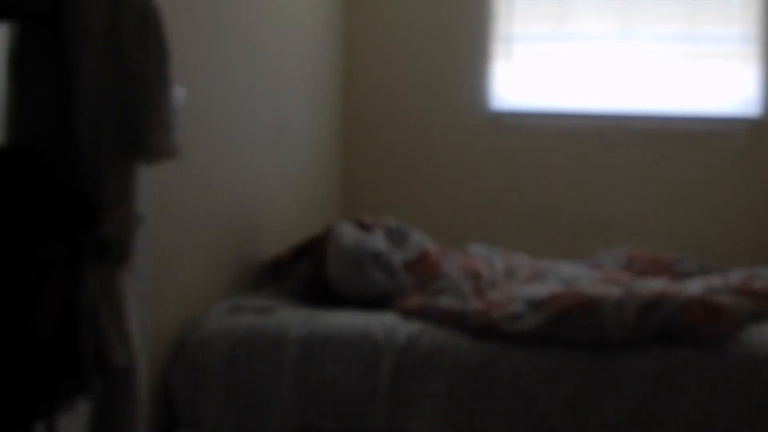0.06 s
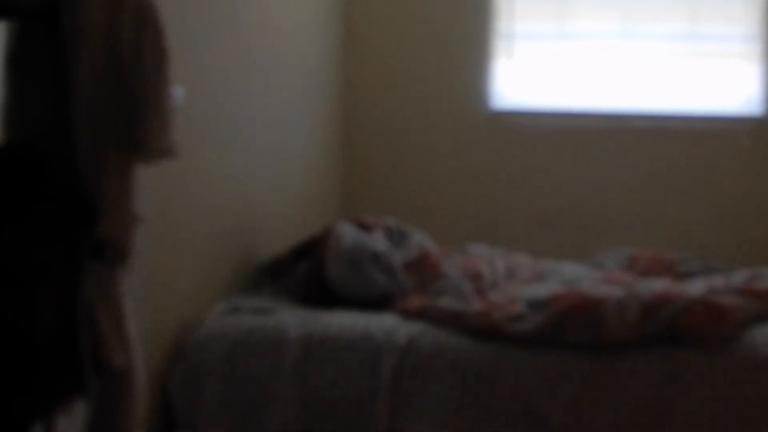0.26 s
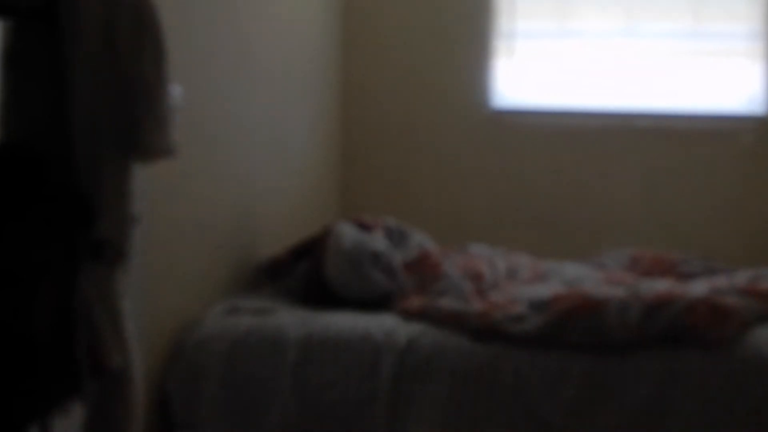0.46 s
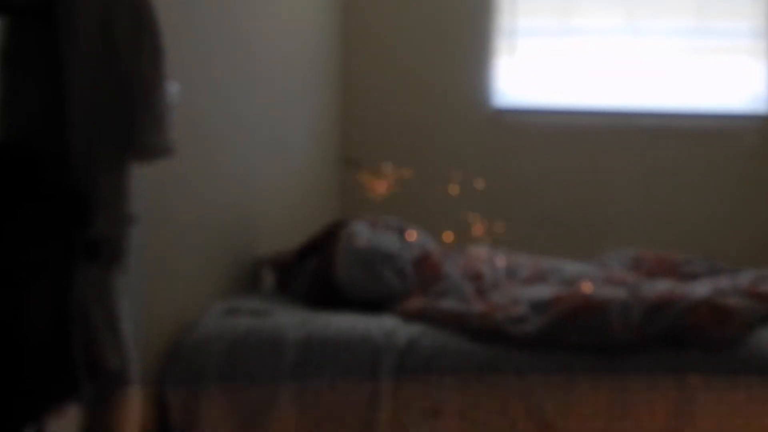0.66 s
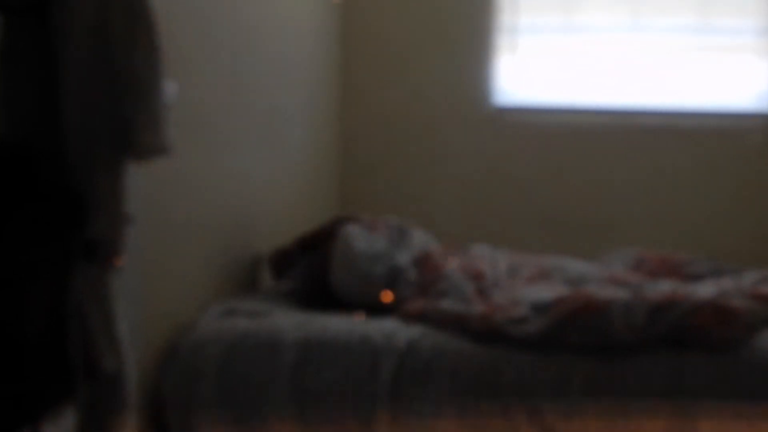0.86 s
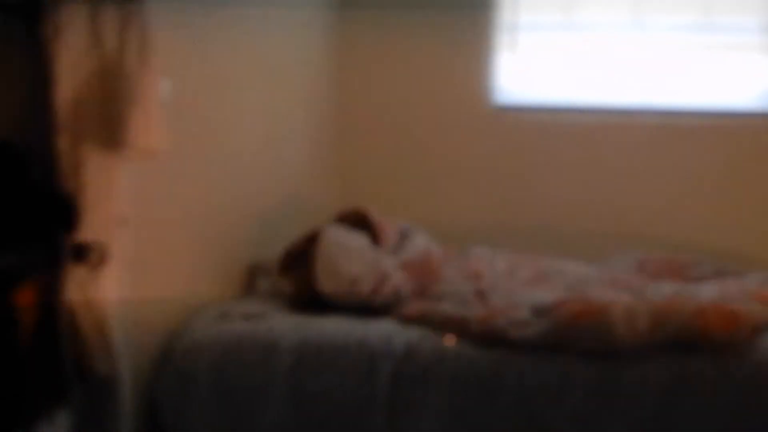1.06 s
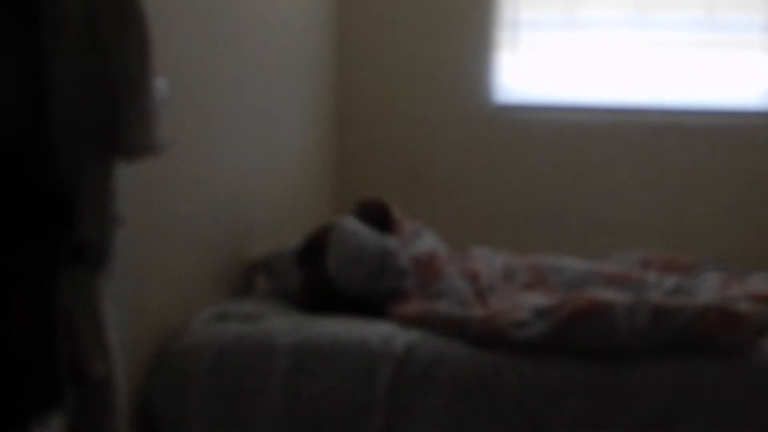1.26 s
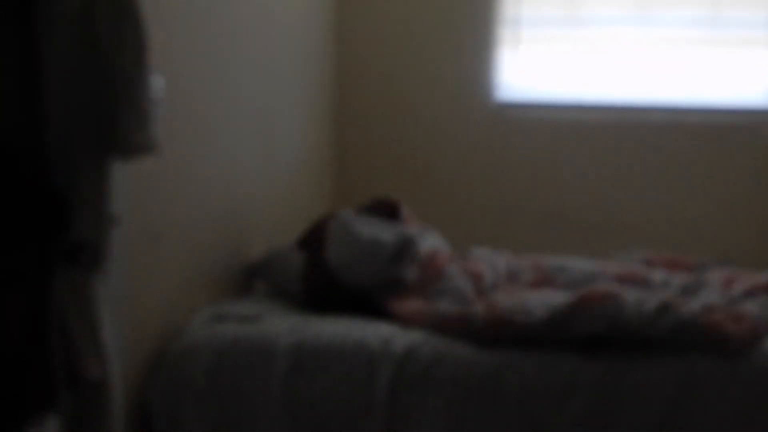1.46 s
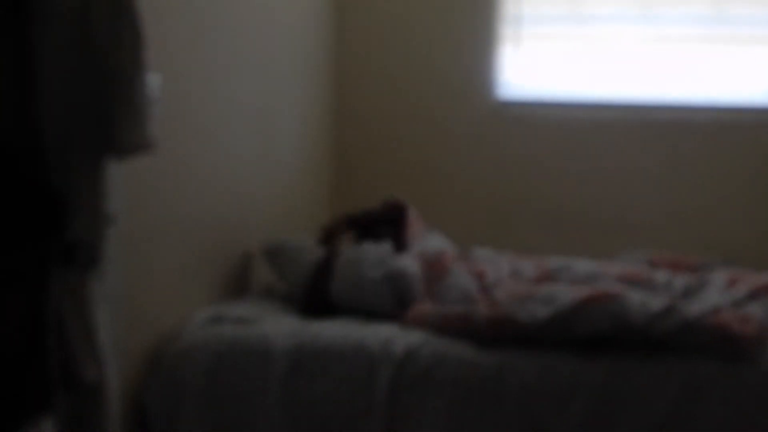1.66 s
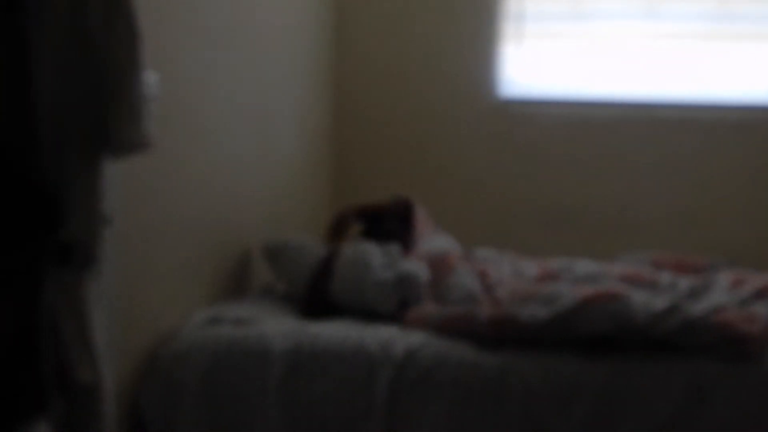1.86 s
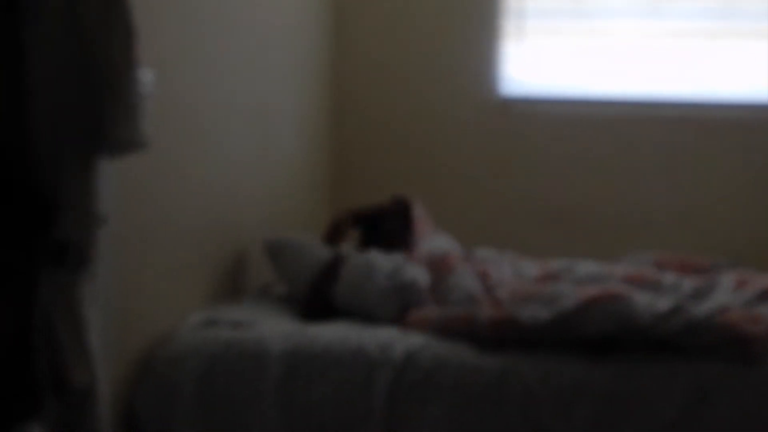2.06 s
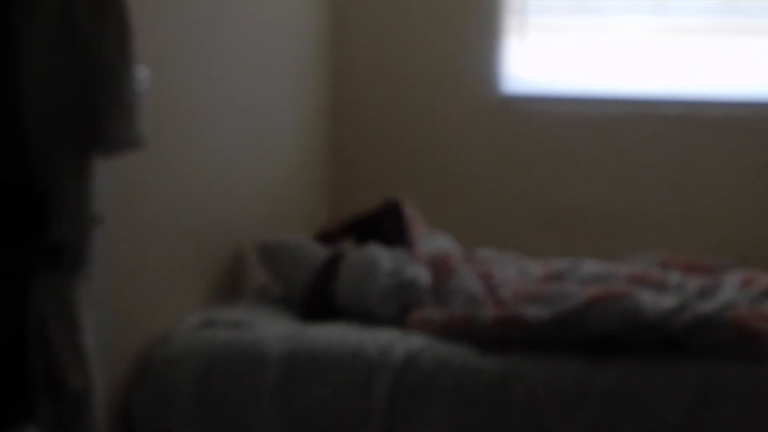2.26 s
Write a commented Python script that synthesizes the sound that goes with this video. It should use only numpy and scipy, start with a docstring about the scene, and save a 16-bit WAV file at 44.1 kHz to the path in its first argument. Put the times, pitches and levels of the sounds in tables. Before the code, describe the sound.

A string of firecrackers goes off indoors after a short sizzling fuse, over a faint low hum. Loud, distorted bangs come in a quick cluster with a short room echo, then a single straggler pops after a pause.

```python
"""Firecrackers in a small bedroom

A fuse hisses and spits, a jet of gas and sparks, over an appliance's low hum. Then a string of
firecrackers goes off: two bursts, a rapid run, and a straggler after a last bit of fuse. Each pressure
pulse sets the room reverberating and overloads the microphone; the gain control ducks and stays down."""
import sys
import numpy as np
from scipy import signal
from scipy.fft import rfft, irfft, next_fast_len
from scipy.io import wavfile
from scipy.ndimage import uniform_filter1d

SR = 44100
rng = np.random.default_rng(int(sys.argv[2]) if len(sys.argv) > 2 else 0)


def generate_wav(signal):
    """Clip the signal to [-1, 1] and save it as 16-bit WAV at the path in sys.argv[1]."""
    frames = np.transpose(np.atleast_2d(signal))
    scaled = np.clip(frames, -1, 1) * 32767
    pcm = np.round(scaled).astype(np.int16)
    wavfile.write(sys.argv[1], SR, pcm)


N = 101429
T = np.arange(N) / SR
FFT_SIZE = 2 * next_fast_len(N // 2 + 1)
FFT_HZ = np.fft.rfftfreq(FFT_SIZE, 1 / SR)

# the explosions: t/s, level/dB, thump relative to that level/dB
BLASTS = [(.561, 44, 2.5), (.803, 43.5, -1), (0.845, 42, -6.5), (1.004, 46, -2.5), (1.055, 46, -3),
          (1.099, 46.5, -1.5), (1.155, 53, -4.5), (1.207, 45, -4.5), (1.264, 46, 1.5), (1.337, 38, -0.5),
          (1.380, 34.5, -8.5), (2.0129, 47.5, 8)]


def firecrackers():
    """Sudden gas expansion radiates an N-wave; the room's air swings in a low thump and reverberates."""
    onsets, level_db, thump_db = np.transpose(BLASTS)
    pulse_s, pulse_gain_db = .005, 5.5
    n_waves = np.zeros(N)
    for onset, db in zip(onsets, level_db):
        during = (T >= onset) & (T < onset + pulse_s)
        n_waves += from_db(db + pulse_gain_db) * (1 - 2 * (T - onset) / pulse_s) * during
    ring = reverberation(level_db)
    thump = unit_rms(low_pass(stereo_noise(), hz=258)) * room_decay(level_db + thump_db, t60=.14)
    return n_waves + ring + thump + afterring(level_db)


def reverberation(level_db):
    """The blasts leave a diffuse field, which absorption drains at a different rate in each band."""
    # the room's response to a blast: f/Hz, relative spectral density/dB
    spectrum = [(30, -3), (120, -7.5), (300, 4), (800, 1.5), (1400, 0.5), (2500, -3), (4500, -3),
                (8000, -7), (15000, -12.5)]
    # reverberation time: f/Hz, T60/s
    decay_times = [(50, 0.079), (130, 0.32), (300, 0.24), (1000, 0.28), (2500, 0.32), (5000, 0.31),
                   (9000, 0.28), (15000, .23)]
    centres, t60s = np.transpose(decay_times)
    field = rfft(unit_rms(colour(stereo_noise(), spectrum)), FFT_SIZE)
    ring = np.zeros((2, N))
    for weights, t60 in zip(np.eye(len(t60s)), t60s):
        band_gain = at_hz(np.c_[centres, weights], FFT_HZ)   # overlapping triangular bands
        ring += irfft(field * band_gain, FFT_SIZE)[:, :N] * room_decay(level_db, t60)
    return ring


def afterring(level_db):
    """Something metal in the room rings on faintly, outlasting the main reverberation."""
    # the lingering ring: f/Hz, relative spectral density/dB
    spectrum = [(200, -9), (600, -8.5), (1500, -4), (2500, -2.5), (4000, -8), (10000, -23.5)]
    return unit_rms(colour(stereo_noise(), spectrum)) * room_decay(level_db - 32.5, t60=.73)


def room_decay(level_db, t60):
    """Incoherent blasts add in energy, which decays exponentially; the envelope is its square root."""
    onsets = np.array(BLASTS)[:, 0]
    energy_in = np.bincount((onsets * SR).astype(int), from_db(level_db) ** 2, N)
    retained = from_db(-120 / (t60 * SR))
    return np.sqrt(signal.lfilter([1], [1, -retained], energy_in + 1e-18))


def main_fuse():
    """Combustion noise in two bands, body and treble, flares and subsides before the first blast."""
    # course of the burn: t/s, relative body level/dB, relative treble level/dB
    burn = [(0.0, -37, -41), (0.128, -33, -37), (0.14, -26, -31), (0.192, -32, -36), (0.268, -19, -24),
            (0.274, -21, -23), (0.308, -23, -26), (0.316, -23, -21), (0.372, -28, -29), (0.446, -33, -30),
            (0.518, -36, -36), (0.545, -34, -33)]
    # body of the hiss: f/Hz, relative spectral density/dB
    body_spectrum = [(30, -7), (120, 3.5), (210, 3.5), (290, 5.5), (480, 4), (700, -1.5), (1000, 3),
                     (2000, -3), (4000, -1), (7000, -5.5), (15000, -17)]
    # treble of the hiss: f/Hz, relative spectral density/dB
    treble_spectrum = [(2000, -17.5), (5000, -2), (8000, 1), (11000, 0), (15500, -1)]
    body_db, treble_db = in_time(burn)
    body = from_db(body_db + .5) * sizzle(body_spectrum)
    treble = from_db(treble_db + 6) * sizzle(treble_spectrum)
    return (body + treble) * (T < .57)   # burnt out at the first blast


def last_fuse():
    """Combustion noise, thinner in tone, leads to the straggler."""
    # course of the burn: t/s, relative level/dB
    burn = [(1.4, -30), (1.7, -24), (1.78, -23), (1.85, -25), (1.89, -22), (1.95, -26), (2.01, -28)]
    # the thin hiss: f/Hz, relative spectral density/dB
    spectrum = [(100, -16), (600, -17), (1500, -19), (2600, -12), (4500, 0), (7200, 2), (10000, -10),
                (15000, -12)]
    level_db, = in_time(burn)
    lit_s = burn[0][0]
    return from_db(level_db + 4.5) * sizzle(spectrum) * (T > lit_s)


def fuse_spits():
    """Brief jets from the fuse radiate noise with a sudden onset and an exponential decay."""
    # the spits: t/s, level/dB, T60/s, low-pass cutoff f/Hz
    spits = [(0.14, -26.5, 0.12, 6100), (0.228, -26, 0.11, 5000), (0.315, -18.5, 0.04, 13040),
             (.452, -14, 0.0041, 14300), (1.802, -7.5, 0.014, 3200), (1.871, -9.5, 0.013, 12000)]
    jet = stereo_noise()
    sound = np.zeros((2, N))
    for onset, db, t60, hz in spits:
        envelope = (T >= onset) * from_db(db - 60 * np.clip((T - onset) / t60, 0, 4))
        sound += envelope * unit_rms(low_pass(jet, hz))
    return sound


def sizzle(spectrum):
    """Burning powder radiates the turbulent noise of a gas jet and the shot noise of sparks; rms 1."""
    sparks_per_s, spark_share = 2500, .34   # share of the power
    spark_db = np.minimum(rng.exponential(1, (2, N)), 5)
    amplitudes = from_db(spark_db) * rng.choice([-1, 1], (2, N))
    sparks = unit_rms(amplitudes * (rng.random((2, N)) < sparks_per_s / SR))
    jet = np.sqrt(spark_share) * sparks + np.sqrt(1 - spark_share) * rng.standard_normal((2, N))
    return unit_rms(colour(early_reflections(stereo(*jet)), spectrum))


def early_reflections(x, count=24, span_s=.03, echo_db=-17):
    """Echoes from walls, floor and ceiling interfere with the direct sound and colour it."""
    delays_s = rng.uniform(.05, 1, count) * span_s
    response = np.zeros(SR // 10)
    response[0] = 1
    response[(delays_s * SR).astype(int)] = rng.choice([-1, 1], count) * from_db(echo_db)
    return signal.fftconvolve(x, response[None], axes=1)[:, :N]


def room_tone(hum_hz=118.6, hum_db=-34, air_db=-35):
    """An appliance's steady vibration radiates a pure tone over dull air noise."""
    # air noise: f/Hz, relative spectral density/dB
    air_spectrum = [(30, 4), (70, 8.5), (180, -3), (380, -4.5), (1000, -21), (4000, -24.5), (15000, -38)]
    hum = from_db(hum_db) * np.sqrt(2) * np.sin(2 * np.pi * hum_hz * T)
    return hum + from_db(air_db) * unit_rms(colour(stereo_noise(), air_spectrum))


def stereo(mid, side):
    """Two independent signals mix into a partly coherent pair, most alike in the middle frequencies."""
    # likeness of left and right: f/Hz, correlation (0 to 1)
    coherence = [(60, 0.4), (250, 0.7), (500, 0.84), (1000, 0.83), (2800, 0.94), (5000, 0.83), (8000, .66),
                 (14000, .3)]
    alike = at_hz(coherence, FFT_HZ)
    common = rfft(mid, FFT_SIZE) * np.sqrt((1 + alike) / 2)
    opposed = rfft(side, FFT_SIZE) * np.sqrt((1 - alike) / 2)
    return irfft(np.array([common + opposed, common - opposed]), FFT_SIZE)[:, :N]


def stereo_noise():
    """White noise, partly coherent between left and right."""
    return stereo(*rng.standard_normal((2, N)))


def colour(x, spectrum):
    """Minimum-phase filter: folding the cepstrum makes the given magnitude response causal."""
    size = 2 * next_fast_len(N // 2 + SR // 10)
    magnitude = from_db(at_hz(spectrum, np.fft.rfftfreq(size, 1 / SR)))
    cepstrum = irfft(np.log(magnitude))
    cepstrum[1:size // 2] *= 2
    cepstrum[size // 2 + 1:] = 0
    return irfft(rfft(x, size) * np.exp(rfft(cepstrum)), size)[..., :N]


def low_pass(x, hz):
    """Second-order roll-off above the cutoff."""
    return signal.sosfilt(signal.butter(2, hz, fs=SR, output="sos"), x)


def in_time(rows):
    """Linear interpolation of each column at every sample."""
    times, *columns = np.transpose(rows)
    return [np.interp(T, times, column) for column in columns]


def at_hz(points, hz):
    """Interpolation on a log-frequency axis."""
    f, value = np.transpose(points)
    return np.interp(np.log(np.maximum(hz, 1)), np.log(f), value)


def pan(db):
    """A level difference between the channels gives direction; negative is to the right."""
    return from_db([[db], [-db]])


def from_db(db):
    return 10 ** (np.asarray(db) / 20)


def unit_rms(x):
    return x / np.sqrt(np.mean(x ** 2) + 1e-20)


def scene():
    """Superposition of fuses, firecrackers and room tone, all slightly right of centre."""
    fuses = main_fuse() + last_fuse() + fuse_spits()
    return firecrackers() * pan(-1) + (fuses + room_tone()) * pan(-1.3)


def gain_control(x, threshold_db=-7, detector_s=.0026, attack_s=.0011, sink_db_per_s=.4):
    """Peak-hold compression: the gain drops within milliseconds, then keeps sinking very slowly."""
    power = uniform_filter1d(np.mean(x ** 2, axis=0), int(detector_s * SR))
    excess_db = np.maximum(10 * np.log10(np.maximum(power, 1e-12)) - threshold_db, 0)
    held_db = np.maximum.accumulate(excess_db - sink_db_per_s * T) + sink_db_per_s * T
    pole = np.exp(-1 / (attack_s * SR))   # this lag lets the first crack through
    return from_db(-signal.lfilter([1 - pole], [1, -pole], held_db))


def record(dry):
    """The microphone saturates and colours the sound; gain control, clipping and a steep top cut follow."""
    # microphone response: f/Hz, gain/dB
    response = [(25, -14), (60, -17), (130, -10), (250, -5.5), (400, -3), (900, -0.5), (1130, -2.5),
                (1370, -10.5), (1700, -0.5), (2300, 4), (3500, 3), (5000, 1), (7500, 0), (10000, -1.5),
                (15500, -8)]
    ceiling, knee = from_db(31.5), 3.4   # a higher knee clips harder
    overloaded = dry / (1 + np.abs(dry / ceiling) ** knee) ** (1 / knee)
    ducked = colour(overloaded, response) * gain_control(overloaded)
    rumble = from_db(-83.5) * unit_rms(low_pass(stereo_noise(), hz=70))
    top_cut = signal.ellip(12, .1, 70, 15750, fs=SR, output="sos")
    return signal.sosfilt(top_cut, np.clip(ducked + rumble, -1, 1))


dry = scene()
out = record(dry)
generate_wav(out)
```